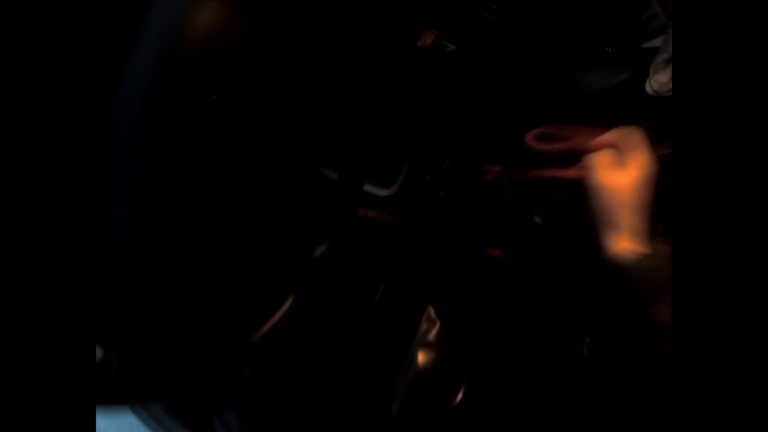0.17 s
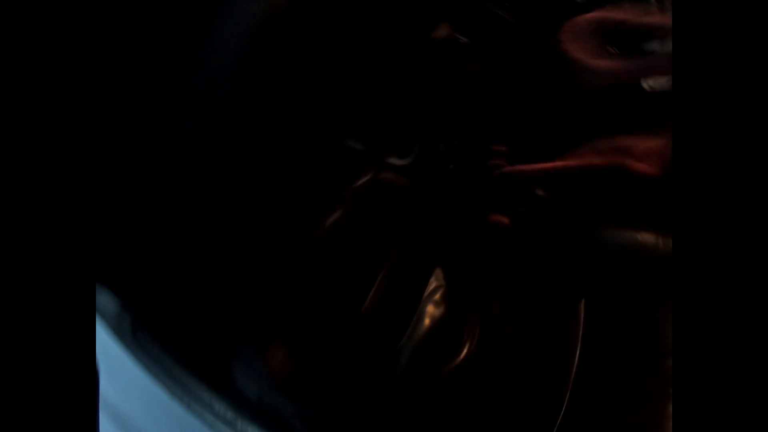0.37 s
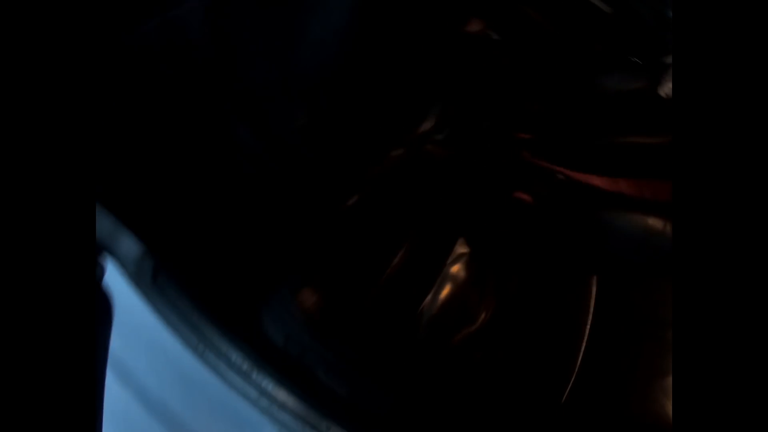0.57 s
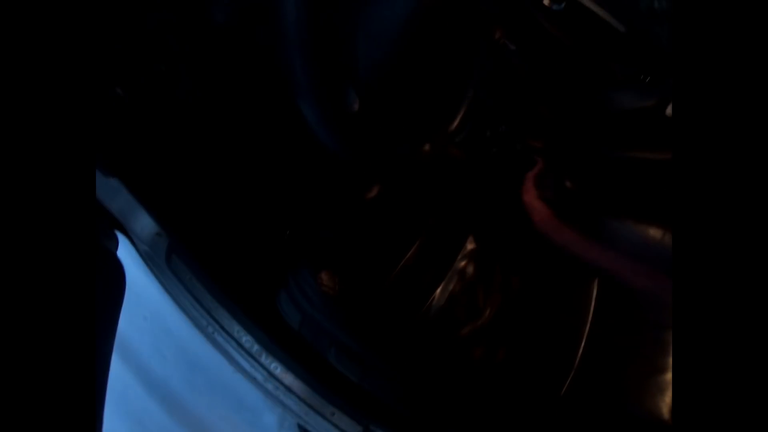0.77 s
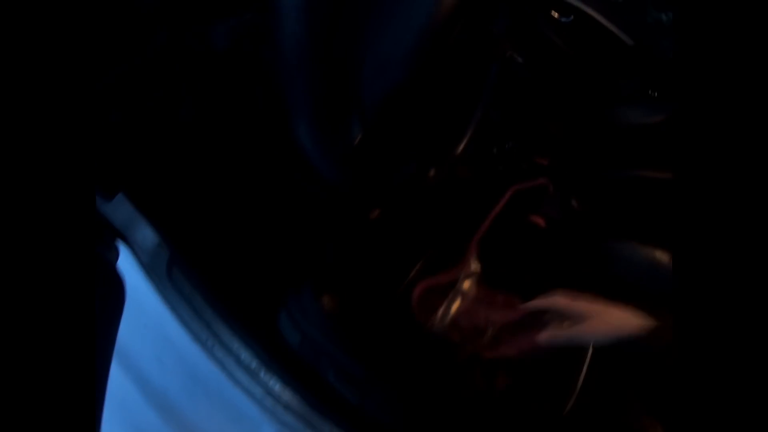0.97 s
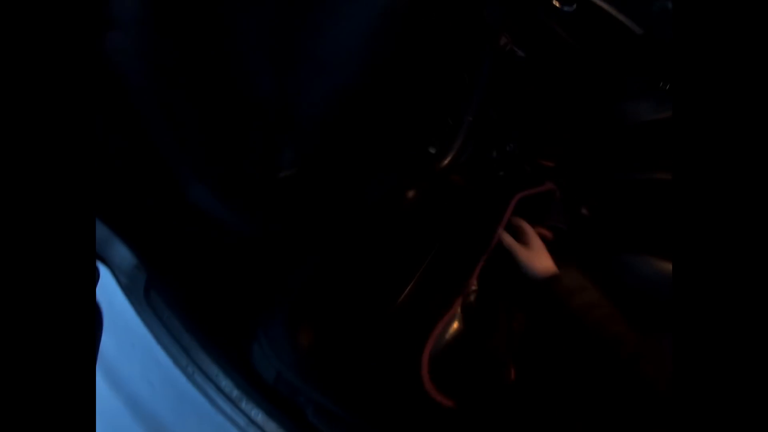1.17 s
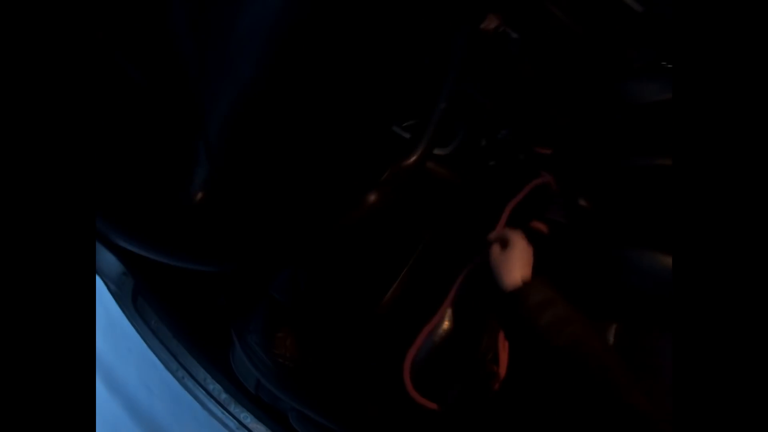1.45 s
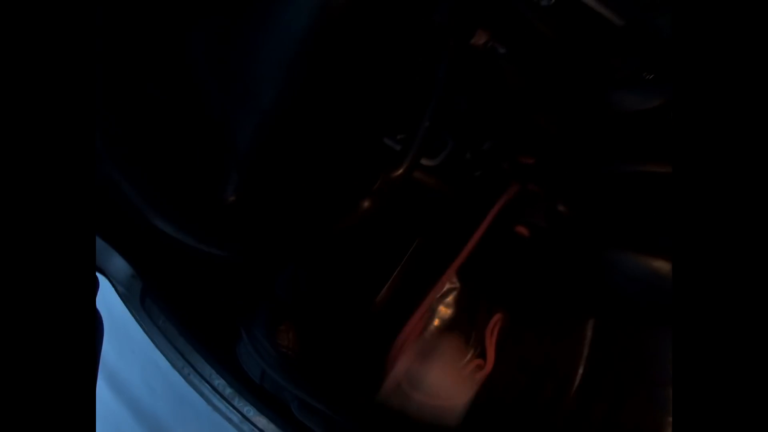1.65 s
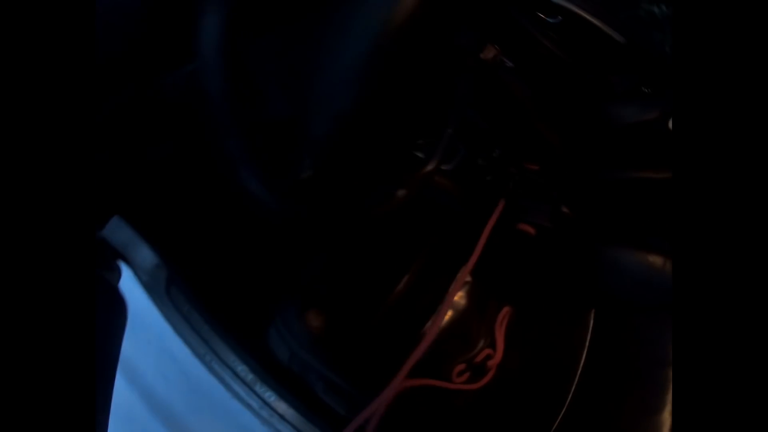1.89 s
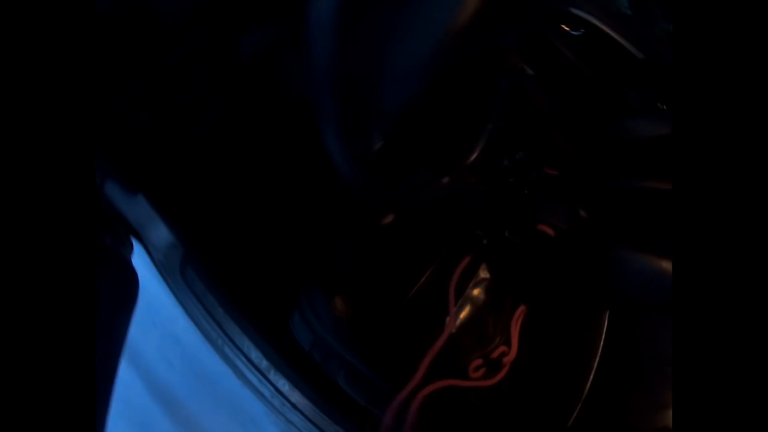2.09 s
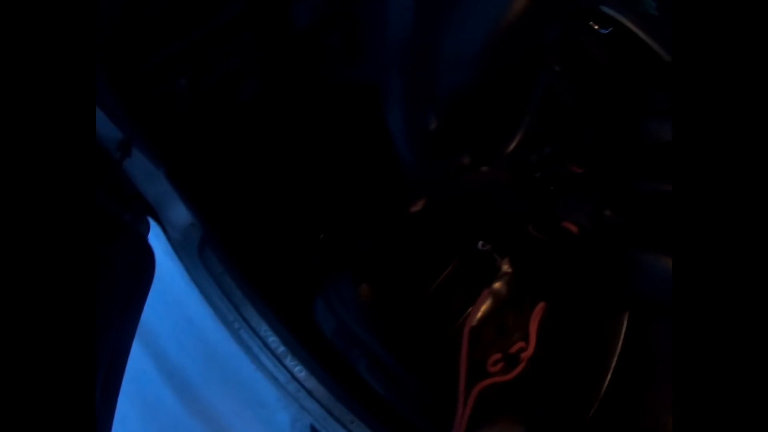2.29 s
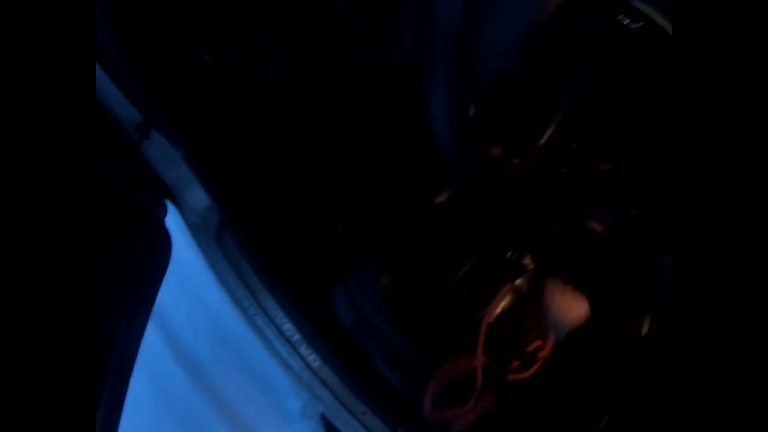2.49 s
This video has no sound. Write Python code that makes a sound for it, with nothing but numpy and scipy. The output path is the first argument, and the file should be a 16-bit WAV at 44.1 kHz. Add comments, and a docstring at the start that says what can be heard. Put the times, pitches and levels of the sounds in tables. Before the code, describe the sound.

Close stereo sound of paws knocking in a car boot: scattered scuffs, a firm knock, a heavier cluster of thumps, lighter claw taps, then softer bumps with tiny metallic clinks over faint outdoor air.

```python
"""Paws and claws knock on the lining of an open car boot as a dog shifts and its leash is gathered, nearby.
Each knock is impact noise filtered by lining resonances; claws tap hard trim and the floor thumps in damped modes.
Body, coat and sleeves rub as clumped grains of friction noise; late on, a leash clip clinks in metal modes.
A very short diffuse echo follows the impacts. Faint air noise lies behind, with a narrow-band whine
swelling late and a thin rising whistle at the end."""
import sys
import numpy as np
from scipy import signal
from scipy.fft import rfft, irfft
from scipy.io import wavfile
from scipy.ndimage import uniform_filter1d

SR = 44100
rng = np.random.default_rng(int(sys.argv[2]) if len(sys.argv) > 2 else 0)


def materialize(psi):
    """Save the field psi as 16-bit PCM at rate SR to the path in sys.argv[1].

    A 1-D psi becomes a single channel; in a 2-D psi each row is a channel.
    """
    bounded = np.clip(np.atleast_2d(psi).T, -1, 1)
    quanta = np.round(bounded * 32767).astype(np.int16)
    wavfile.write(sys.argv[1], SR, quanta)


N = 116865

# Low friction of the body on the floor, relative spectrum: f/Hz, level/dB
RUB_SPECTRUM = [(20, -11), (55, 4), (90, -0.5), (190, 3), (300, -10.5), (450, -18.5), (1000, -58.5)]
# Course of that rubbing: t/s, level/dB
RUB_LEVEL = [(0, -78), (.15, -45.5), (.62, -55.5), (.85, -45.5), (1.02, -48), (1.33, -45.5), (1.562, -54),
             (1.68, -60), (1.77, -52.5), (2.08, -55), (2.42, -43.5), (2.6, -68)]
# Fur and sleeves brushing the lining: mid-stroke t/s, length/s, scrape level/dB, hiss level/dB, ring f/Hz
STROKES = [(0.146, 0.11, -45.5, -57.5, 853), (0.284, 0.071, -49, -55.5, 864),
           (0.42, 0.043, -40.5, -55.5, 690), (0.618, 0.039, -55, -54.5, 1330),
           (0.725, 0.025, -40.5, -50.5, 577), (0.817, 0.064, -45.5, -55, 1080),
           (0.908, 0.028, -45, -52.5, 505), (0.997, 0.036, -44, -51, 1270), (1.067, 0.06, -52, -69.5, 1210),
           (1.808, 0.091, -56.5, -65, 760), (1.894, 0.11, -47.5, -62.5, 258),
           (2.425, 0.027, -53.5, -67, 980)]
# Scraping on the lining, relative spectrum: f/Hz, level/dB
SCRAPE_SPECTRUM = [(130, -0.5), (300, 9.5), (750, 1), (1500, 2.5), (2100, 0), (3200, 1), (5000, -20),
                   (10000, -39)]
# Coat hiss, relative spectrum: f/Hz, level/dB
HISS_SPECTRUM = [(1500, -32), (3500, -4.5), (7500, 1), (9300, -4), (10800, -18), (15000, -33.5)]
# Steady outdoor noise, relative spectrum: f/Hz, level/dB
AIR_SPECTRUM = [(40, -3.5), (200, -5), (500, -20), (1200, -16.5), (2400, -18), (8500, -22), (11000, -33),
                (15500, -48)]
AIR_DB = -61
# Course of the faint whine: t/s, level/dB
WHINE_LEVEL = [(1.5, -98), (1.66, -62), (2.0, -84), (2.3, -63.5), (2.65, -62.5)]
# Paws knocking and scuffing: t/s, level/dB, ring f/Hz, body level/dB, edge level/dB, scuff t60/s
KNOCKS = [(.105, -35, 1120, 4.5, 7, 0.12), (.203, -31.5, 670, -1.5, -3.5, 0.058),
          (.251, -33, 1540, -13, -1, 0.16), (.297, -30, 750, -8.5, -5.5, 0.042),
          (.306, -30.5, 730, -9, -0.5, 0.043), (.447, -21, 680, -5, -25, 0.031),
          (.454, -25, 540, 5.5, -1.5, 0.077), (.704, -36.5, 530, -9, -2, 0.048),
          (.722, -30, 1400, 4.5, -3, 0.026), (.818, -31.5, 1180, 4, -2, 0.1), (.9, -28.5, 477, 8, -3, 0.1),
          (.985, -33, 1310, -54, 2, 0.18), (1.113, -29.5, 940, 8, -12, 0.066),
          (1.158, -35, 1500, 8, -5, 0.019), (1.185, -26, 900, 3.5, -8.5, 0.035),
          (1.193, -29, 1060, 9.5, -6, 0.022), (1.206, -24.5, 1130, 4.5, -8, 0.04),
          (1.317, -45, 670, 1, -26, 0.03), (1.932, -34, 960, 1.5, -1.5, 0.19),
          (2.163, -40, 790, -1, -18, 0.0069), (2.211, -33, 1670, -3, 1, 0.037),
          (2.275, -34, 950, 0, -0.5, 0.043), (2.349, -40, 970, -35, -5, 0.028)]
# Reverberation of the padded cabin: f/Hz, t60/s
CABIN_DECAY = [(100, 0.14), (400, 0.073), (12000, 0.079)]
# Weight landing on the floor: t/s, level/dB, f/Hz, t60/s
THUMPS = [(.112, -32, 150, 0.045), (.232, -38, 205, 0.059), (.452, -18, 215, 0.02),
          (.716, -24.5, 263, 0.042), (1.081, -24, 190, 0.015), (1.117, -21.5, 195, 0.048),
          (1.187, -20, 128.4, 0.125), (1.2095, -16, 128, 0.064), (1.305, -30.5, 169, 0.046),
          (1.522, -33, 136, 0.065), (1.932, -25.5, 243, 0.066), (1.992, -30, 181, 0.05),
          (2.132, -36.5, 126.5, 0.14), (2.213, -29.5, 216, 0.051), (2.215, -33.5, 71, 0.08),
          (2.27, -39.5, 116, 0.1), (2.352, -29, 105, 0.093)]
# Claws and gear tapping hard trim: t/s, level/dB, ring f/Hz, edge level/dB
TAPS = [(.274, -35, 2760, 5), (.336, -27, 1520, 0), (.524, -40.5, 1600, 9), (.546, -29, 1560, -3.5),
        (.613, -41.5, 1340, 5), (.642, -31, 1140, -2.5), (.675, -35.5, 1600, 1), (.796, -30.5, 2250, 4),
        (1.0, -28, 1255, -2), (1.168, -28, 1620, 8.5), (1.343, -46, 1580, -2), (1.37, -41.5, 1300, -3.5),
        (1.409, -42.5, 800, 1), (1.497, -38.5, 1590, -3), (1.509, -41, 1230, -1), (1.594, -36.5, 1550, 2.5),
        (1.656, -47.5, 1250, -17), (1.738, -38.5, 1210, 1), (1.797, -45, 1580, -6), (1.845, -51, 1620, -28)]
# Metal leash clip: t/s, level/dB, strongest ring f/Hz, rattle t60/s
CLINKS = [(1.874, -42.5, 7940, 0.052), (1.918, -40.5, 7850, 0.29), (2.06, -45.5, 6840, 0.035),
          (2.215, -42, 3300, 0.0094), (2.254, -41.5, 7100, 0.21), (2.279, -32.5, 8500, 0.032),
          (2.356, -28, 7850, 0.027), (2.427, -45, 6700, 0.032), (2.481, -51.5, 6700, 0.021)]
CLIP_MODES = [(3335, -9, .06), (4377, -9, .06), (4635, 2.5, .06), (4974, -9, .07), (6702, -3, .08),
              (6860, -5, .065), (7500, -6, .05), (7900, -3, .025), (8420, -5, .04), (8970, -2, .05)]
CLIP_TICK = [(500, -13), (3400, 1), (6100, 5), (6900, 10.5), (8300, 7), (10000, -14), (15000, -11)]
# Correlation of left and right: f/Hz, coefficient (0-1)
CORRELATION = [(150, 0.97), (350, 0.95), (700, 0.69), (1400, 0.3), (3000, 0.64), (6000, 0.68)]
EDGE_HZ = 15900


def amp(db):
    """Amplitude ratio: a level of 20 dB is a factor of ten."""
    return 10 ** (np.asarray(db) / 20)


def unit(x):
    """Normalisation to a root-mean-square value of 1."""
    return x / np.sqrt(np.mean(x ** 2) + 1e-20)


def read(points, hz):
    """Linear interpolation of a table along a logarithmic frequency axis."""
    f, value = np.transpose(points)
    return np.interp(np.log(hz + 1), np.log(f + 1), value)


def add(mix, s, sound):
    """Superposition: a stereo sound joins the mix at time s."""
    part = mix[:, max(round(s * SR), 0):][:, :sound.shape[1]]
    part += sound[:, :part.shape[1]]


def pair(z):
    """Partial coherence: two unrelated signals form a left and right most alike in the bass."""
    size = z.shape[1]
    same = np.clip(read(CORRELATION, np.fft.rfftfreq(size, 1 / SR)), 0, 1)
    mid, side = rfft(z) * np.sqrt([(1 + same) / 2, (1 - same) / 2])
    return irfft([mid + side, mid - side], size)


def colour(x, db_at):
    """Minimum-phase filtering: the gain curve db_at(Hz) fixes the phase through a Hilbert transform."""
    size = 4096
    gain_db = np.maximum(db_at(abs(np.fft.fftfreq(size, 1 / SR))), -90)
    log_gain = np.log(amp(gain_db))
    response = np.exp(np.conj(signal.hilbert(log_gain)))
    taps = np.fft.ifft(response).real[:size // 2]
    return signal.fftconvolve(x, taps[None], axes=1)[:, :x.shape[1]]


def bump(f, hz, octaves):
    """Resonance curve of height 1, falling to one half at the given octaves from its centre."""
    return 1 / (1 + (np.log2((f + 1) / hz) / octaves) ** 2)


def fade(t, t60):
    """Exponential damping: the amplitude falls by 60 dB in t60 seconds, 2 ms at least."""
    return np.exp(-np.log(1000) * t / max(t60, .002))


def struck(x, db):
    """Impact energy: the total equals that of 5 ms at the level db."""
    return amp(db) * x / np.sqrt(np.sum(x ** 2) / 2 / (.005 * SR))


def friction(spectrum, grains_per_s, spread_db, clump_db):
    """Stick-slip friction: random grains of uneven size, clumped in time, at rms 1."""
    clumps = uniform_filter1d(rng.standard_normal(N), size=400)
    clumps = unit(uniform_filter1d(clumps, size=200))
    present = rng.random(N) < grains_per_s / SR
    sizes = amp(spread_db * np.minimum(rng.exponential(1, N), 4)) * present
    grains = pair(rng.standard_normal((2, N)) * sizes * amp(clump_db * clumps))
    return unit(colour(grains, lambda f: read(spectrum, f)))


def rubbing():
    """Sliding friction at low frequency: the dog's body rubs unevenly on the carpeted floor."""
    level = np.interp(np.arange(N) / SR, *np.transpose(RUB_LEVEL))
    return amp(level) * friction(RUB_SPECTRUM, grains_per_s=2000, spread_db=2, clump_db=3)


def catches(s, length, hz, count=14, cycles=3, scatter_octaves=0.26, glide=0.075, reach=.65):
    """Stick-slip of fur in a stroke: each catch is a short pitched grain gliding up or down."""
    out, t = np.zeros((2, N)), np.arange(SR // 20) / SR
    for when, pitch, slide, *sizes in rng.standard_normal((count, 5)):
        turns = (t - t.mean()) * hz * 2 ** (scatter_octaves * pitch)
        envelope = np.exp(-(turns / cycles) ** 2)
        grain = envelope * np.sin(2 * np.pi * turns * (1 + glide * slide * turns / cycles))
        start = s + np.tanh(when) * reach * length - t.mean()
        add(out, start, np.outer(sizes, grain))
    return unit(pair(out))


def rustle(rest_scrape_db=-63, rest_hiss_db=-68, ring_db=8, ring_octaves=1.0, catch_db=-2, smooth_db=-4):
    """Friction exciting a resonance: strokes scrape and catch on a ringing spot while a coat hisses."""
    t = np.arange(N) / SR
    grains = friction(SCRAPE_SPECTRUM, grains_per_s=2400, spread_db=2.5, clump_db=3.5)
    scrape, hiss_gain = amp(rest_scrape_db) * grains, amp(rest_hiss_db)
    for s, length, scrape_db, hiss_db, hz in STROKES:
        swell = np.exp(-2 * ((t - s) / length) ** 2)
        ringing = unit(colour(grains, lambda f: ring_db * bump(f, hz, ring_octaves)))
        smooth = amp(smooth_db) * swell * ringing
        # the catches are scaled by the spread of the swell
        caught = amp(catch_db) * swell.std() * catches(s, length, hz)
        scrape = scrape + amp(scrape_db) * (smooth + caught)
        hiss_gain = hiss_gain + amp(hiss_db) * swell
    return scrape + hiss_gain * friction(HISS_SPECTRUM, grains_per_s=15000, spread_db=2, clump_db=3.0)


def air(whine_hz=1430, whine_octaves=0.098):
    """Filtered noise: a faint steady outdoor background and a narrow airy whine that comes in late."""
    noise = pair(rng.standard_normal((2, N)))
    background = unit(colour(noise, lambda f: read(AIR_SPECTRUM, f)))
    whine = unit(colour(noise, lambda f: 20 * np.log10(bump(f, whine_hz, whine_octaves))))
    level = np.interp(np.arange(N) / SR, *np.transpose(WHINE_LEVEL))
    return amp(AIR_DB) * background + amp(level) * whine


def contact(length, snap, rise_s=0.00058, ragged_db=3):
    """Impact followed by friction: a first touch, then a dying scuff of clustered tiny slips."""
    t = np.arange(4096) / SR
    clusters = unit(uniform_filter1d(rng.standard_normal(len(t)), size=150))
    envelope = fade(t, length) * (1 - np.exp(-t / rise_s))
    slips = rng.standard_normal((2, len(t))) * amp(ragged_db * clusters) * envelope
    slips /= np.sqrt(np.sum(slips ** 2) / 2)
    slips[0, 0] += snap
    return pair(slips)


def knock(db, hz, body_db, edge_db, length, ring_db=9, ring_octaves=0.21,
          panel_db=7, panel_octaves=0.071, snap=0.46):
    """Impact on a resonant lining: one ring is set by the spot struck, two fixed ones by the panel."""
    shape = [(40, -30.0), (130, body_db), (300, body_db + 8.5), (430, body_db / 2 + 0.5),
             (650, -2.0), (1600, -1), (2200, edge_db - 4.5), (3600, edge_db - 5.0),
             (5300, edge_db - 17.5), (8500, edge_db - 19), (11000, edge_db - 41.5), (15500, edge_db - 50)]

    def gain_db(f):
        panel = panel_db * (bump(f, 603.3, panel_octaves) + bump(f, 735.6, panel_octaves))
        return read(shape, f) + ring_db * bump(f, hz, ring_octaves) + panel

    return struck(colour(contact(length, snap), gain_db), db)


def cabin(x, wet_db=-10, delay_s=0.0052):
    """Diffuse reverberation: dense short reflections, damped by frequency, from the boot's walls."""
    noise = pair(rng.standard_normal((2, SR // 3)))
    hz, t, z = signal.stft(noise, SR, nperseg=256)
    decay = np.exp(-np.log(1000) * t / read(CABIN_DECAY, hz)[:, None])
    tail = signal.istft(z * decay, SR)[1]
    # silent for delay_s, then a rise over an equal time
    tail = tail * np.clip(np.arange(tail.shape[1]) / SR / delay_s - 1, 0, 1)
    tail = tail / np.linalg.norm(tail[0])
    return x + amp(wet_db) * signal.fftconvolve(x, tail, axes=1)[:, :N]


def thump(db, hz, t60, rise_s=0.0022, overtone_db=-9, under_db=-17):
    """Flexural modes: the carpeted floor has one main swing with a weaker mode on either side."""
    t = np.arange(SR // 3) / SR
    turn = 2 * np.pi * hz * t
    swing = np.sin(turn) + amp(overtone_db) * np.sin(1.42 * turn) + amp(under_db) * np.sin(.72 * turn)
    envelope = (1 - np.exp(-t / rise_s)) * fade(t, t60)
    return np.tile(amp(db) * np.sqrt(2) * swing * envelope, (2, 1))


def tap(db, hz, edge_db, length=0.029, snap=0.4, body_db=-13):
    """Light, hard impact: a hollow ring of the trim, too brief to stir the panel."""
    return knock(db, hz, body_db, edge_db, length, ring_db=13, ring_octaves=.25, panel_db=0, snap=snap)


def clink(db, hz, length, focus_db=7, tick_db=0, wander_hz=430):
    t = np.arange(SR // 10) / SR
    touch = contact(length, snap=0.25)
    modes = np.zeros(len(t))
    for f, level, t60 in CLIP_MODES:
        phase = 2 * np.pi * np.cumsum(f + wander_hz * rng.standard_normal(len(t))) / SR
        modes += amp(level + focus_db * bump(f, hz, 0.09)) * fade(t, t60) * np.sin(phase)
    ringing = unit(signal.fftconvolve(touch, modes[None], axes=1)[:, :touch.shape[1]])
    tick = unit(colour(touch, lambda f: read(CLIP_TICK, f) + focus_db * bump(f, hz, 0.091)))
    return struck(ringing + amp(tick_db) * tick, db)


def whistle(start_s=2.594, hz=9400, glide_hz_per_s=2200, db=-63, rise_s=0.0067, flutter_db=5):
    """Frequency and amplitude modulation: a thin high tone rises and flutters at the very end."""
    t = np.maximum(np.arange(N) / SR - start_s, 0)
    flutter = unit(uniform_filter1d(rng.standard_normal(N), size=300))
    tone = np.sin(2 * np.pi * (hz + glide_hz_per_s * t / 2) * t)
    return amp(db + flutter_db * flutter) * np.minimum(t / rise_s, 1) * tone


def scene():
    """Superposition: the impacts sound in the cabin, over rubbing, rustle, air and whistle."""
    hits = np.zeros((2, N))
    for table, source in ((KNOCKS, knock), (THUMPS, thump), (TAPS, tap), (CLINKS, clink)):
        for s, *row in table:
            add(hits, s, source(*row))
    return cabin(hits) + rubbing() + rustle() + air() + whistle()


def record(dry):
    """Band limitation: a linear-phase low-pass removes the top of the treble."""
    low_pass = signal.firwin(511, EDGE_HZ, window=("kaiser", 9), fs=SR)
    return signal.oaconvolve(dry, low_pass[None], "same")


dry = scene()
out = record(dry)
materialize(out)
```